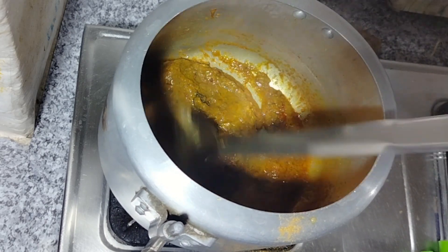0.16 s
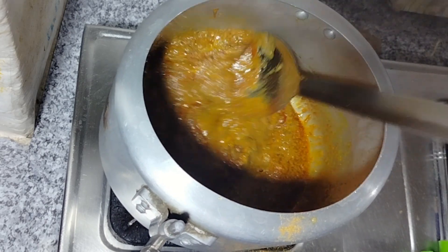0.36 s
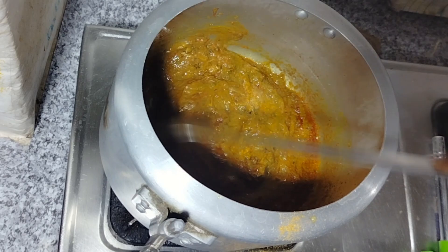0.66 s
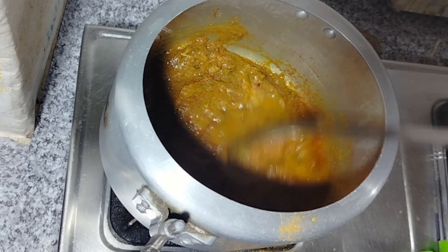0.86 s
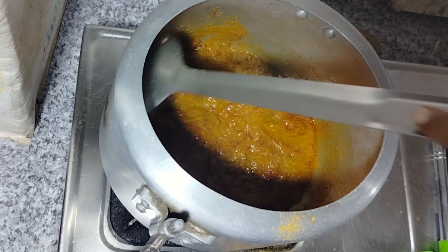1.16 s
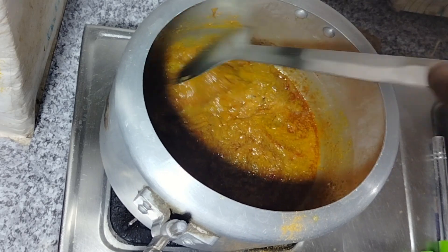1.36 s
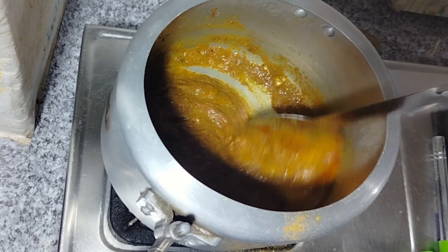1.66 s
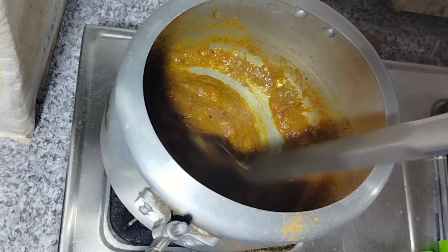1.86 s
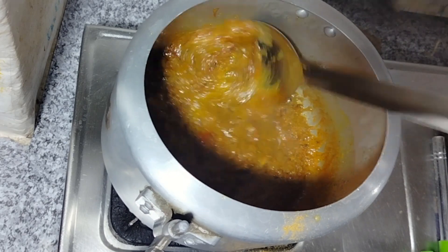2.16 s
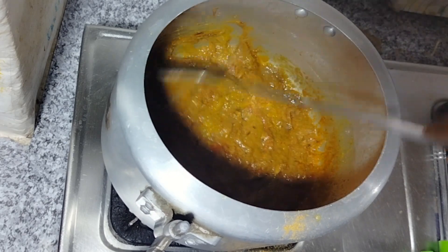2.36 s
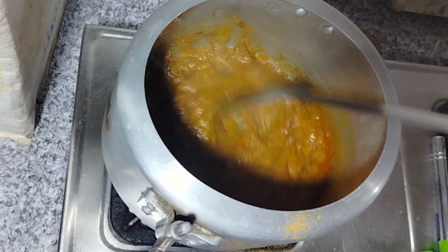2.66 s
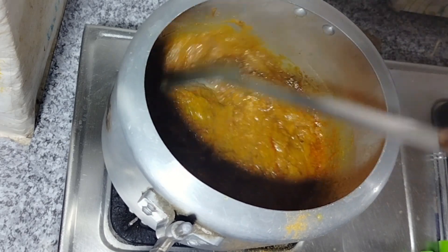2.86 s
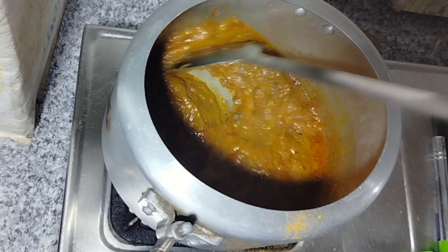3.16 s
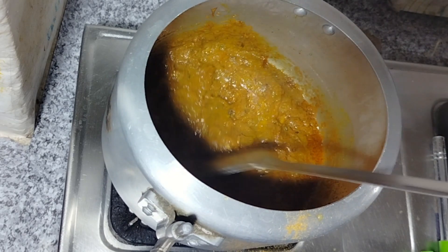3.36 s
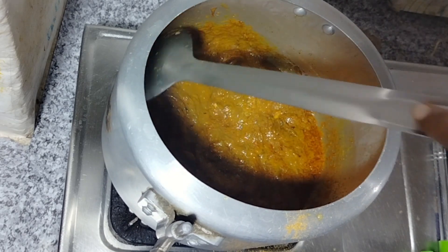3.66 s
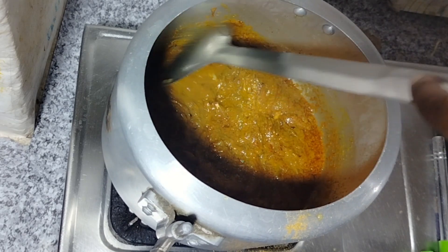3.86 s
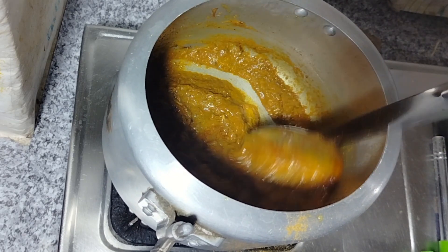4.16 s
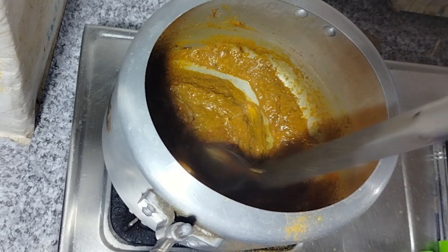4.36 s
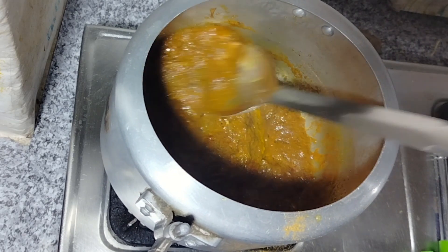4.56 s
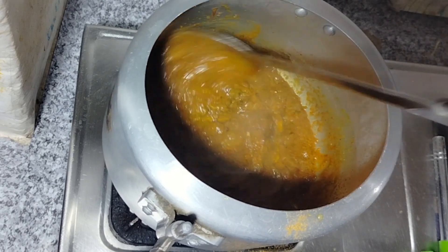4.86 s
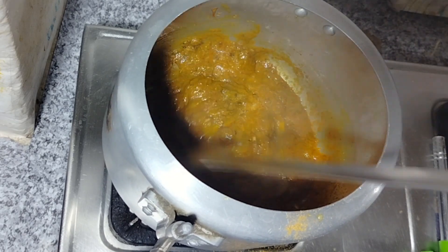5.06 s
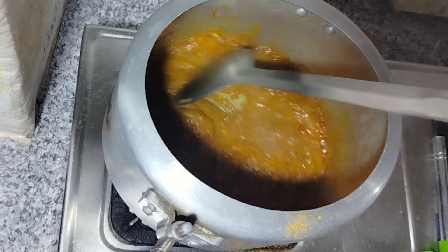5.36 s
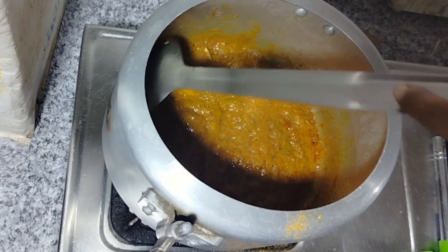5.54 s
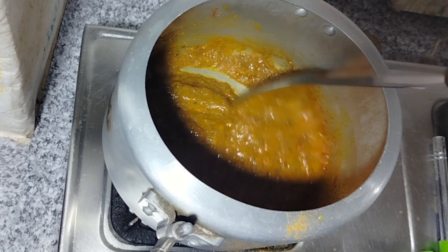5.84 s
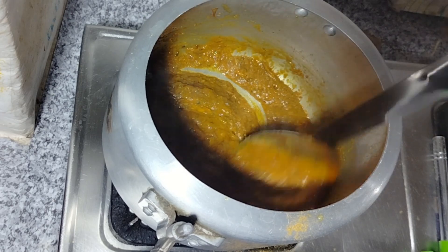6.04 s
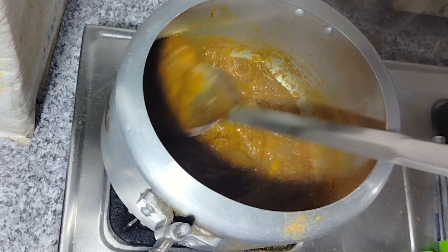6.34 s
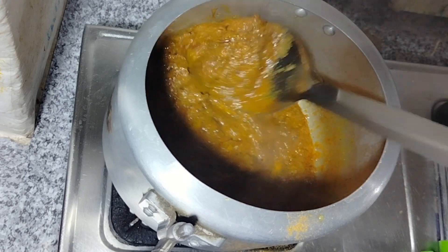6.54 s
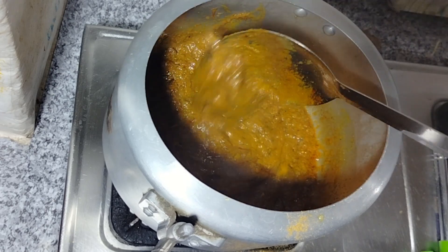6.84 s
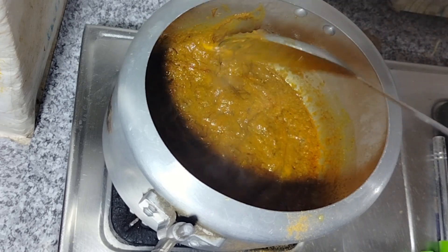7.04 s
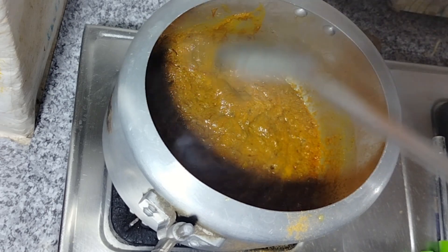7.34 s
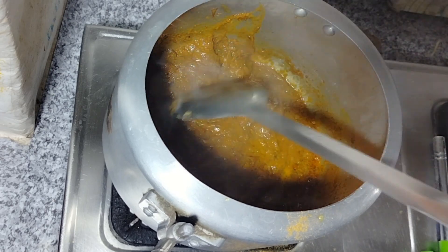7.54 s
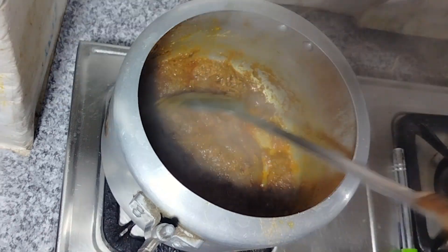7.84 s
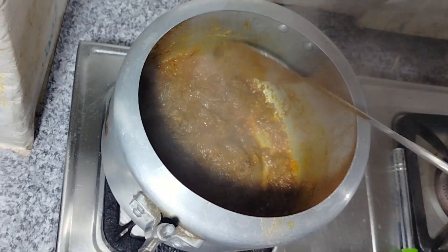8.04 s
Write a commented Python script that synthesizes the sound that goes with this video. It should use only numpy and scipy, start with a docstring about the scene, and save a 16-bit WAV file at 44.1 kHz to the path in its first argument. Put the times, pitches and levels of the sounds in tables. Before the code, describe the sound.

A ladle works around a resonant metal pot, heard through a close stereo microphone with short kitchen reflections. Rhythmic scrapes squelch through paste and grate on metal, with hollow booms and hard knocks, loudest mid-way. Frying stays faint beneath, with a barely audible low hum. After a calmer stretch and a light tap, loud crackly sizzling cuts in suddenly and holds to the end.

```python
"""A steel ladle stirs thick, quietly frying paste in a metal pressure cooker, close by in a small kitchen.
It drags through paste, grates the bare wall, then squelches on; knocks cluster near 3.5 s and 5.4 s.
Light rubs and an empty tap follow; at 7.63 s a dense sizzle cuts in under the last scrapes.
Scrapes and knocks are noise through the pot's resonances; booms, metal notes and plops are damped sines.
Frying is shaped grainy noise with random bubbles; a faint low hum lies underneath."""
import sys
import numpy as np
from scipy import signal
from scipy.fft import rfft, irfft, next_fast_len
from scipy.io import wavfile
from scipy.ndimage import uniform_filter1d, map_coordinates

SR = 44100
rng = np.random.default_rng(int(sys.argv[2]) if len(sys.argv) > 2 else 0)


def bounce(signal):
    """Save signal as a 16-bit WAV file at the path given by the first command-line argument."""
    frames = np.transpose(np.atleast_2d(signal))
    limited = np.clip(frames, -1, 1)
    pcm = np.round(limited * 32767).astype(np.int16)
    wavfile.write(sys.argv[1], SR, pcm)


N = 361531
TIME = np.arange(N) / SR  # s
SIZE = next_fast_len(N + SR, True)  # FFT length with spare room for tails
HZ = np.fft.rfftfreq(SIZE, 1 / SR)

# resonances of the pot while the ladle is in the paste: f/Hz, width/Hz, relative level/dB
PASTE_MODES = [(292.5, 11, -0.5), (331.3, 13, -1), (438.2, 19.2, 0), (760.5, 31, -5), (1078, 41, -6),
               (1178, 32, -1.5), (1430, 32, -15.5), (1803, 45, -4), (2295, 27, -6.5), (2861, 60, -7),
               (3365, 89, -8)]
# ringing resonances of the bare metal: f/Hz, width/Hz, relative level/dB
BARE_MODES = [(441.3, 10, -10.5), (594.8, 11, -6), (800, 8.3, -20.5), (1030, 30, -5), (1097, 75, -13.5),
              (1153, 17, -4), (1622, 30, -5.5), (1848, 14, 0.5), (1980, 36, 2.5), (2099, 20, 3.5),
              (2167, 19, -0.5), (2640, 10.6, -7), (3010, 7, 1), (3480, 9.1, -6.5), (3820, 24, 4.5),
              (3890, 14, 2), (4030, 21, -3), (4060, 36, 1.5), (4280, 52, -3.5), (4460, 15, -12),
              (4620, 17, 1.5), (6220, 87, -5.5), (7900, 9, -24.5), (8000, 12, -5.5)]


def amp(db):
    """Decibels to gain."""
    return 10 ** (np.asarray(db) / 20)


def unit(x):
    """Scale to rms 1."""
    return x / np.sqrt(np.mean(x ** 2) + 1e-20)


def along(points, hz):
    """Read a curve of (Hz, value) points on a log frequency axis."""
    f, value = np.transpose(points)
    return np.interp(np.log(hz + 1), np.log(f + 1), value)


def wobble(rate):
    """A smooth random curve through `rate` knots a second."""
    knots = rng.standard_normal(int(N * rate / SR) + 4)
    return map_coordinates(knots, [TIME * rate])


def add(track, s, sound):
    """Mix a sound into the track at time s."""
    part = track[max(round(s * SR), 0):][:len(sound)]
    part += sound[:len(part)]


def filtered(x, response):
    """Pass x through a frequency response."""
    return irfft(rfft(x, SIZE) * response, SIZE)[..., :N]


def causal(gain):
    """The minimum-phase response of a gain curve: it rings only after it is struck."""
    cepstrum = irfft(np.log(np.maximum(gain, 1e-6)), SIZE)
    cepstrum[1:SIZE // 2] *= 2
    cepstrum[SIZE // 2 + 1:] = 0
    return np.exp(rfft(cepstrum))


def body(modes, dense, modes_db, slope_db):
    """Gain of the pot: strong resonances, tilted by slope_db an octave, over a bed of dense weak ones."""
    pivot_hz = 2100
    power = amp(along(dense, HZ)) ** 2
    for hz, width, db in modes:
        off = (2 * (HZ - hz) / width) ** 2
        peak = amp(db + modes_db + slope_db * np.log2(hz / pivot_hz)) ** 2
        power += peak / ((1 + off) * (1 + off / 50))  # the far skirts fall faster
    return np.sqrt(power)


def registers(edges_hz, order=12):
    """Gains that split the spectrum at the edges and keep its power."""
    below = [0] + [1 / (1 + (HZ / hz) ** order) for hz in edges_hz] + [1]
    return [np.sqrt(np.abs(upper - lower)) for lower, upper in zip(below, below[1:])]


def grit(rate, smooth):
    """Tiny impacts of random size, `rate` a second, over a smooth share of noise; rms 1."""
    grains = (rng.random(N) < rate / SR) * rng.standard_normal(N)
    return unit(unit(grains) + smooth * rng.standard_normal(N))


def pressure(size=40000):
    """Stroke power by place (paste, bare wall), register (drag, rub, grit) and sample: swell, hold, lift."""
    # strokes of the ladle: t/s, swell/s, hold/s, relative level/dB,
    # drag over level/dB, grit over level/dB, share of bare wall/0-1
    strokes = [(0, 0.0036, 0.038, -54.5, 9, -6, 0.16), (0.027, 0.053, .08, -44.5, -4, -0.5, 0.04),
               (0.115, .11, 0.042, -27.5, -10, 0.5, 0.04), (0.522, 0.023, 0.096, -52, -3, -4, 0.77),
               (0.618, 0.04, 0.087, -27, -1.5, 0, 0.84), (0.736, 0.034, .115, -27, -21.5, 6, 1),
               (1.061, 0.028, 0.16, -41.5, 3, -1.5, 0), (1.354, 0.038, .07, -38.5, -5, -1, 0.07),
               (1.577, .01, 0.11, -58, 13.5, -15, 0.06), (1.691, 0.019, 0.073, -36, -0.5, 3.5, 0.01),
               (1.768, 0.049, 0.037, -36, 5.5, -1, 0), (1.904, 0.021, .003, -33.5, -3, 3, 0),
               (1.972, 0.015, 0.063, -32.5, -1.5, 0.5, 0), (2.165, 0.061, 0.063, -38.5, 1.5, 5, 0.01),
               (2.331, 0.068, 0.054, -27, -5.5, 0.5, 0.01), (2.536, 0.017, 0.14, -32, 1, 1, 0),
               (2.735, 0.059, .015, -28.5, -6, 6.5, 0), (3.016, 0.0099, 0.012, -52.5, 4.5, -3, 0.13),
               (3.135, .008, 0.034, -38.5, 5.5, 3, 0.98), (3.163, 0.044, 0.031, -29, -8, 5, 0.94),
               (3.244, 0.024, 0.059, -40, 3, -3, 0.73), (3.384, 0.0083, .03, -18.5, -20.5, -5.5, 1),
               (3.487, .02, 0.12, -34.5, 0.5, -1.5, 0.4), (3.727, 0.017, 0.021, -41, 3.5, -15, 0),
               (3.95, 0.022, 0.036, -38, -2.5, -10.5, 0), (4.004, 0.019, 0.31, -60, 6.5, 4.5, 0.4),
               (4.374, 0.05, 0.058, -49, 7.5, -0.5, 0.05), (4.472, 0.092, .02, -30, -13, 2, 0),
               (4.937, 0.017, 0.046, -26.5, -4, -1.5, .85), (4.97, 0.062, .11, -25, -8, 3, 0.99),
               (5.192, 0.027, 0.36, -37, -10, -3.5, 0.46), (5.427, 0.023, .18, -39.5, -1, -15.5, 0),
               (5.755, 0.024, 0.016, -47.5, 7, -6, 0), (6.29, 0.019, 0.016, -55.5, -1.5, -5.5, 0.04),
               (6.574, 0.03, 0.043, -56, -12, -10.5, 0.06), (6.727, .035, 0.027, -57, -2, 0, 0.09),
               (6.902, 0.028, .015, -55, -10, -2, 0.08), (7.95, 0.026, 0.12, -46.5, 13, -2, 0.28),
               (8.075, 0.014, 0.089, -44, 7, 6.5, .45)]
    swell_db = 23.5  # a stroke starts this far below its level
    sag_db_per_s, lift_db_per_s = 23, 295
    # after the lift the paste settles or the wall rings on: dB under the stroke, dB per s
    trails = [(25, 78), (14, 69)]
    t = np.arange(size) / SR
    power = np.zeros((2, 3, N))
    for s, swell, hold, db, drag_db, grit_db, wall in strokes:
        rise_db = swell_db * np.clip(1 - t / swell, 0, 1)
        sag_db = sag_db_per_s * np.clip(t - swell, 0, hold)
        pressed_db = db - rise_db - sag_db
        lifted = np.maximum(t - swell - hold, 0)  # seconds since the lift
        for place, share, (under_db, db_per_s) in zip(power, [1 - wall, wall], trails):
            # the fast lift gives way to the slower trail
            fall_db = np.minimum(lift_db_per_s * lifted, under_db + db_per_s * lifted)
            stroke = share * amp(pressed_db - fall_db) ** 2
            for track, colour_db in zip(place, [drag_db, 0, grit_db]):
                add(track, s, stroke * amp(colour_db) ** 2)
    return power


def roaming(force, patchy_db, size=512):
    """As the point of contact travels, it favours ever different resonances."""
    z = signal.stft(force, nperseg=size)[2]
    field = uniform_filter1d(rng.standard_normal(z.shape), 3, 0)  # blur across frequency
    field = uniform_filter1d(field, 6, 1)  # blur across time
    patchy = z * amp(patchy_db * unit(field))
    return unit(signal.istft(patchy, nperseg=size)[1][:N])


def scraping(power, floor_db, wall_db):
    """The ladle's edge sticks and slips over grit; two rows for two points of contact."""
    # dense weaker modes, in the paste and on the bare wall: f/Hz, relative level/dB
    floor_dense = [(30, -75), (110, -37.5), (220, -45), (290, -7), (400, -21.5), (560, -30.5), (900, -30),
                   (1500, -17), (3000, -16), (5300, -17), (8300, -12), (9400, -23), (15500, -30)]
    wall_dense = [(30, -80), (110, -38.5), (220, -39), (300, -4.5), (400, -15), (700, -30.5), (1350, -26.5),
                  (1900, -13), (3000, -21), (4000, -6.5), (5300, -13.5), (8300, -14), (9400, -25.5),
                  (15500, -34.5)]
    slips = amp(0.99 * wobble(170) + 0.5 * wobble(35))
    force = np.array([roaming(slips * grit(rate=2200, smooth=0.85), patchy_db=5.5) for _ in range(2)])
    floor = body(PASTE_MODES, floor_dense, modes_db=-0.6, slope_db=0.7)
    metal = body(BARE_MODES, wall_dense, modes_db=-1.5, slope_db=1.0)
    sound = np.zeros((2, N))
    for place, gain, place_db in zip(power, [floor, metal], [floor_db, wall_db]):
        for drive, band in zip(place, registers([900, 2600])):
            driven = force * amp(place_db) * np.sqrt(drive)
            sound += filtered(driven, causal(unit(gain * band)))
    return sound


def bubbles(rate, pitch_hz, spread, cycles, size=900):
    """Wet pockets bursting at random, each a few cycles that rise slightly in pitch; rms 1."""
    t = np.arange(size) / SR
    sound = np.zeros(N)
    for when, pitch, strength in rng.random((int(rate * N / SR), 3)):
        turns = pitch_hz * np.exp(spread * (2 * pitch - 1)) * t
        rising = turns * (1 + 0.0071 * turns / cycles)
        pop = np.sin(2 * np.pi * rising) * np.exp(-turns / cycles)
        add(sound, when * N / SR, amp(-18 * strength) * pop)
    return unit(sound)


def squelching(power, squelch_db):
    """The harder the ladle rubs through the paste, the louder the pockets it bursts."""
    paste, _ = power
    _, rub, _ = paste
    return amp(squelch_db) * np.sqrt(rub) * bubbles(rate=350, pitch_hz=2004, spread=0.769, cycles=8.8)


def knocking(size=16000, count=530):
    """Each blow is a crack and a brief chatter of the edge: a clang on the wall, a slap in the paste."""
    # blows of the ladle on the pot: t/s, relative thud of the body/dB, relative clank of the edge/dB,
    # base t60/s, share of bare wall/0-1
    knocks = [(.505, -44, -32.5, 0.1, 0.97), (.627, -35, -28.5, 0.052, 0), (.77, -46, -20.5, 0.1, 1),
              (.79, -56.5, -23, .093, 1), (.899, -55.5, -18, 0.035, 1), (1.098, -19, -30, .042, 0.78),
              (1.116, -29, -35, 0.047, 0.76), (1.157, -39, -35, 0.036, 0.1),
              (1.353, -37, -33.5, .066, 0.04), (1.4, -44, -25, 0.046, 0.06), (1.589, -44.5, -52, 0.2, 0.1),
              (1.981, -48, -37, 0.19, 0), (3.003, -62, -28, .073, 0.81), (3.144, -42, -42, 0.055, 0.6),
              (3.392, -40, -25, .1, 1), (3.443, -17, -25, .04, .9), (3.485, -22.5, -19.5, 0.047, 0.85),
              (3.525, -21, -30.5, 0.043, 0.79), (3.586, -22.5, -26.5, 0.065, 0.57),
              (3.622, -22.5, -35.5, 0.057, .55), (3.755, -28, -49.5, 0.16, 0),
              (3.921, -38.5, -30, 0.11, 0.4), (3.966, -31.5, -57, 0.19, 0), (4.76, -62, -47.5, 0.056, 0),
              (4.884, -46, -38, 0.077, 0.6), (5.063, -42, -21, 0.1, .9), (5.172, -29, -30.5, 0.06, 0.86),
              (5.263, -41.5, -42, .06, 0.8), (5.421, -21, -23.5, 0.046, 0.77),
              (5.439, -19.5, -25.5, 0.07, 0.8), (5.522, -39, -41, 0.028, 0.3), (5.586, -24, -43, .14, 0.06),
              (5.756, -53, -34.5, 0.083, 0.06), (6.691, -72, -52.5, 0.028, 0), (7.278, -45, -40, .055, 0.7),
              (7.89, -47, -45.5, 0.18, 0.3)]
    # dense weaker modes under the clang and the slap: f/Hz, relative level/dB
    clang_dense = [(30, -57.5), (120, -24.5), (220, -25), (280, -5.5), (700, -13), (920, -31),
                   (1400, -17.5), (2500, -4), (5300, -18.5), (8300, -11), (9400, -23), (15500, -28)]
    slap_dense = [(30, -67.5), (120, -20), (200, -28.5), (280, -7.5), (540, -15), (830, -2), (1300, -11.5),
                  (2500, -19), (5300, -17), (8300, -11.5), (9400, -24.5), (15500, -29.5)]
    # spread of a blow over four registers, low to high: level offset/dB, share of the base t60
    spread = [(-4.5, .88), (-1, 0.62), (-1, 1.0), (-2.5, 0.8)]
    t = np.arange(size) / SR
    clang = body(BARE_MODES, clang_dense, modes_db=2.5, slope_db=-5.0)
    slap = body(PASTE_MODES, slap_dense, modes_db=-16.5, slope_db=-3.5)
    answers = []  # impulse responses by register: (on the wall, in the paste)
    for band in registers([700, 1500, 5000]):
        answers.append([irfft(causal(unit(pot * band)), SIZE)[:size] for pot in (clang, slap)])
    crack = 0.62 * amp(-60 * t / 0.011)  # the first bite of the edge is the hardest
    sound = np.zeros((2, N))
    for s, thud_db, clank_db, t60, wall in knocks:
        chatter = rng.standard_normal((2, size)) * (1 - np.exp(-t / 0.0012))
        # the thud fills the two low registers, the clank the two high ones
        levels_db = [thud_db, thud_db, clank_db, clank_db]
        for level_db, (on_wall, in_paste), (register_db, life) in zip(levels_db, answers, spread):
            force = chatter * (amp(-60 * t / (t60 * life)) + crack)
            force[:, 0] += 2.8  # the contact itself, a single click
            answer = wall * on_wall + (1 - wall) * in_paste
            for track, row in zip(sound, force):
                blow = signal.fftconvolve(row, answer)[:size]
                # the level is that of the first `count` samples
                add(track, s, amp(level_db + register_db) * blow / blow[:count].std())
    return sound


def notes(rows, decay, attack, rough, size=22000):
    """Single damped resonances with a slightly unsteady phase; decay is (Hz, t60 s) points."""
    t = np.arange(size) / SR
    sound = np.zeros(N)
    for s, db, hz in rows:
        drift = rough * np.cumsum(rng.standard_normal(size)) / np.sqrt(SR)
        envelope = amp(db - 60 * t / along(decay, hz)) * (1 - np.exp(-t / attack))
        add(sound, s, envelope * np.sin(2 * np.pi * hz * t + drift))
    return sound


def ringing():
    """Booms of the pot, notes of its metal, the ladle's own ring and the plops of the paste."""
    # heavy landings that set the pot booming on its stand: t/s, level/dB, f/Hz
    booms = [(.507, -33.5, 286), (.629, -18.5, 318), (.68, -16, 435), (1.362, -20, 328), (1.39, -22, 280),
             (1.591, -19, 289.5), (3.754, -31.5, 262), (4.885, -21.5, 302), (5.592, -22.5, 269.5),
             (5.758, -32.5, 318), (7.96, -21.5, 337), (8.0, -22.5, 313), (8.15, -31, 300)]
    # touches after which one note of the metal stands out: t/s, level/dB, f/Hz
    pings = [(.901, -23, 3770), (.901, -25, 2210), (1.1, -21.5, 1168), (1.1, -25.5, 445),
             (3.145, -28, 1670), (3.395, -19, 3620), (3.42, -16.5, 1057), (3.586, -29, 601.4),
             (3.923, -29.5, 1794), (5.1, -21, 2108), (5.15, -28, 608), (5.44, -21.5, 1185),
             (7.89, -20, 1810), (8.02, -36, 442.5)]
    # the larger wet plops in the paste: t/s, level/dB, f/Hz
    plops = [(1.362, -26, 954), (1.418, -28.5, 777), (1.455, -26.5, 1580), (2.585, -20.5, 1147),
             (2.66, -21.5, 1136), (5.565, -22.5, 1198), (5.588, -19, 814), (6.058, -44, 1105),
             (6.615, -36, 2760), (6.647, -40, 1150), (6.932, -41, 1930), (7.198, -41.5, 1755),
             (7.474, -45.5, 1160)]
    # the empty ladle taps the wall and rings by itself: t/s, level/dB
    tap_s, tap_db = (7.279, -29)
    # the ladle's resonances: f/Hz, level over the tap/dB
    ladle_modes = [(1655, 0), (3480, -1.5), (4310, 0), (5000, 0), (6100, -1)]
    ladle = [(tap_s, tap_db + db, hz) for hz, db in ladle_modes]
    return (notes(booms, decay=[(280, 0.23), (340, 0.086), (430, 0.12)], attack=0.0042, rough=5)
            + notes(pings, decay=[(600, 0.49), (1500, 0.11), (3700, 0.27)], attack=0.0028, rough=6.8)
            + notes(ladle, decay=[(1600, 0.058), (6000, 0.071)], attack=0.0016, rough=12.0)
            + notes(plops, decay=[(1100, 0.115), (2700, 0.028)], attack=0.0015, rough=16.4))


def frying(simmer_db, sizzle_db, bubble_db):
    """A low simmer with stray bubbles; at 7.63 s a louder, denser sizzle sets in abruptly."""
    # spectrum of the frying and kitchen background: f/Hz, relative level per Hz/dB
    simmer_colour = [(15, -62), (25, -20), (170, 0.5), (223, -6.5), (405, -0.5), (863, -11), (1160, -21),
                     (1260, -19), (1520, -14.5), (1740, -12), (5280, -22.5), (7920, -20.5), (9570, -30.5),
                     (13600, -32), (16000, -45.5)]
    # spectrum of the dense sizzle: f/Hz, relative level per Hz/dB
    sizzle_colour = [(180, -61), (300, -31), (392, -12), (701, -27), (885, 2), (1030, -13), (1140, 4),
                     (1280, -10.5), (2400, -2.5), (8090, -5), (16000, -20)]
    sizzle_start, sizzle_rise = 7.628, 0.0047  # s
    simmer = unit(filtered(grit(rate=1300, smooth=1.3), amp(along(simmer_colour, HZ))))
    sizzle = unit(filtered(grit(rate=3000, smooth=1.0), amp(along(sizzle_colour, HZ))))
    onset = np.clip((TIME - sizzle_start) / sizzle_rise, 0, 1)
    blips = amp(bubble_db) * bubbles(rate=70, pitch_hz=1960, spread=0.72, cycles=13)
    steady = amp(simmer_db + 0.7 * wobble(6)) * simmer
    fizz = amp(sizzle_db + 0.33 * wobble(42)) * onset * sizzle
    return steady + fizz + blips


def hum(hz, hum_db):
    """A faint low hum that wavers in level and phase."""
    level = amp(hum_db + 1.1 * wobble(1.7))
    return level * np.sin(2 * np.pi * hz * TIME + 0.45 * wobble(13))


def reflections(x, decay, size=20000):
    """x through a random tail in which each frequency dies at its own speed; decay is (Hz, t60 s) points."""
    hz, t, z = signal.stft(rng.standard_normal(size), SR, nperseg=128)
    fading = z * amp(-60 * t / along(decay, hz)[:, None])
    tail = signal.istft(fading, SR, nperseg=128)[1]
    return signal.fftconvolve(x, tail / np.linalg.norm(tail))[:N]


def scene():
    """The pot close in front, spread by its own wall and by the kitchen."""
    # colour of the pot-wall reflections that differ between the two sides: f/Hz, gain/dB
    width = [(100, -18), (320, -18.5), (600, 2.5), (1200, -2), (2500, 1.5), (8000, 2)]
    # decay of the kitchen: f/Hz, t60/s
    kitchen = [(150, 0.37), (1000, 0.31), (4000, 0.23), (12000, 0.18)]
    # the pot sits a little off centre: f/Hz, left minus right/dB
    tilt = [(60, 2), (130, -2), (290, 1), (640, -1), (1410, -1.5), (3100, -0.5), (6820, -0.5), (15000, 5)]
    power = pressure()
    paste = []
    for _ in range(2):
        squelch = squelching(power, squelch_db=-17.5)
        paste.append(squelch + frying(simmer_db=-58.5, sizzle_db=-49.5, bubble_db=-65.5))
    scrape = scraping(power, floor_db=-2.23, wall_db=-1.56)
    near, far = scrape + knocking() + ringing() + np.array(paste)
    mid = near + hum(hz=177, hum_db=-74)
    # the curved wall throws both parts of the sound sideways
    bounced = 0.31 * reflections(near, [(300, 0.004), (8000, 0.0067)])
    bounced += 0.74 * reflections(far, [(300, 0.004), (8000, 0.037)])
    side = filtered(bounced, causal(amp(along(width, HZ))))
    room = np.array([reflections(near, kitchen), reflections(near, kitchen)])
    pair = np.array([mid + side, mid - side]) + amp(-9) * room
    return filtered(pair, amp(np.outer([0.5, -0.5], along(tilt, HZ))))


def record(dry):
    """The microphone rounds the highest peaks, thins the deepest bass and stops at its band limit."""
    ceiling, bass_hz, top_hz = 0.9, 55, 15900  # full scale = 1, Hz, Hz
    rounded = dry / (1 + np.abs(dry / ceiling) ** 6) ** (1 / 6)
    low_cut = 1j * HZ / (1j * HZ + bass_hz)
    return filtered(rounded, low_cut / (1 + (HZ / top_hz) ** 120))


dry = scene()
out = record(dry)
bounce(out)
```